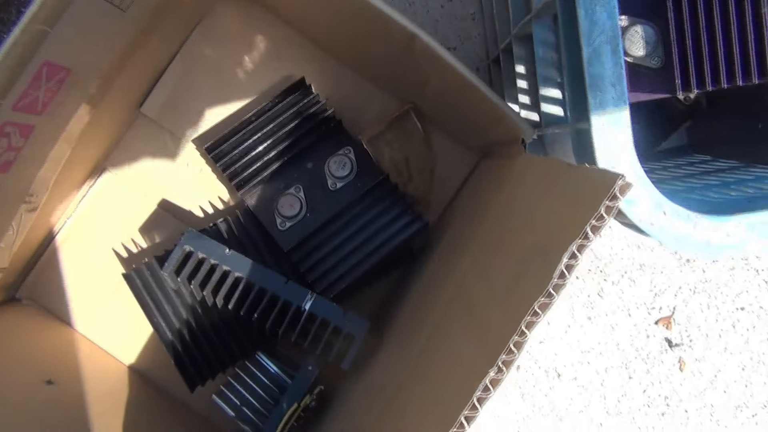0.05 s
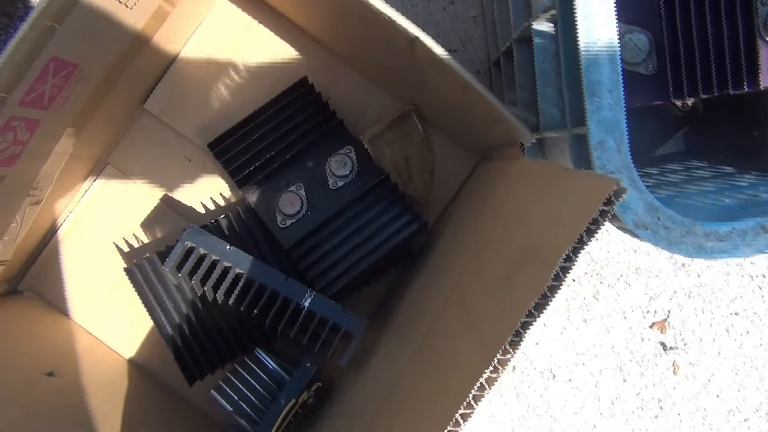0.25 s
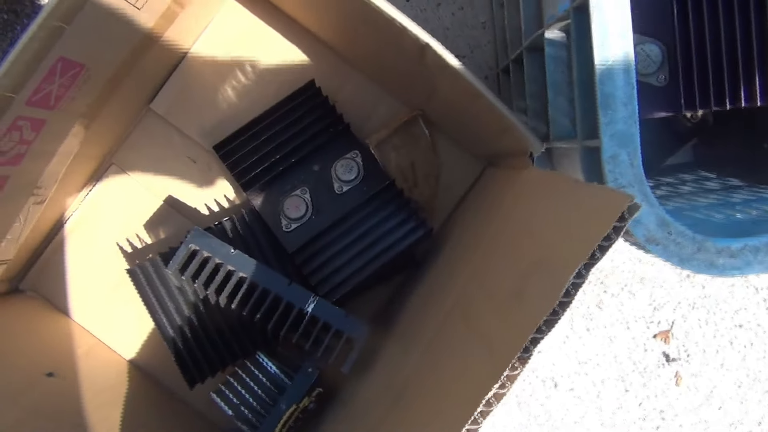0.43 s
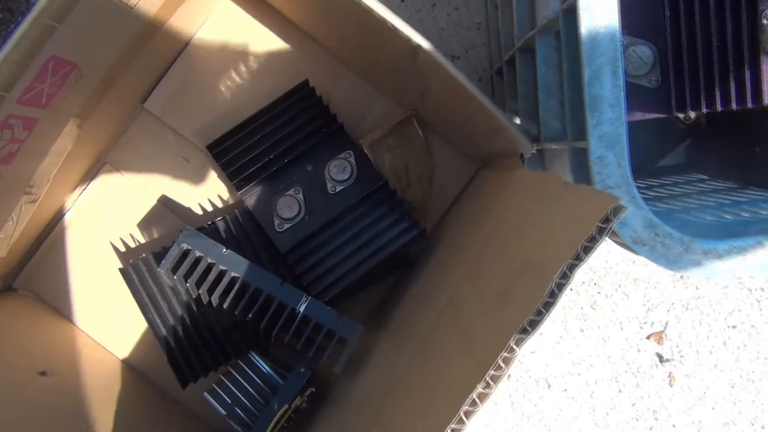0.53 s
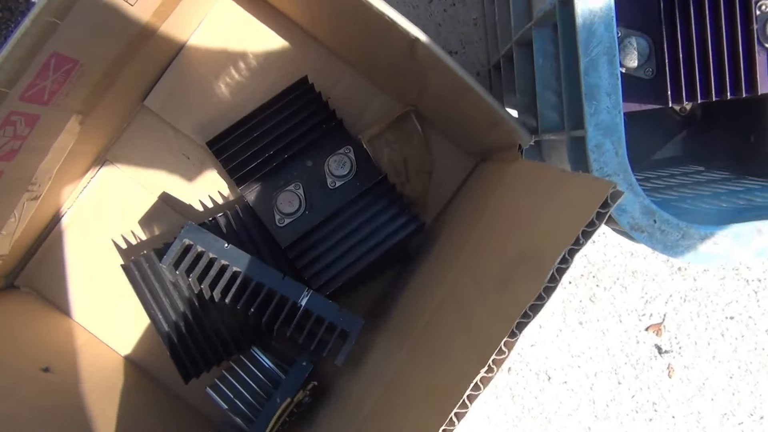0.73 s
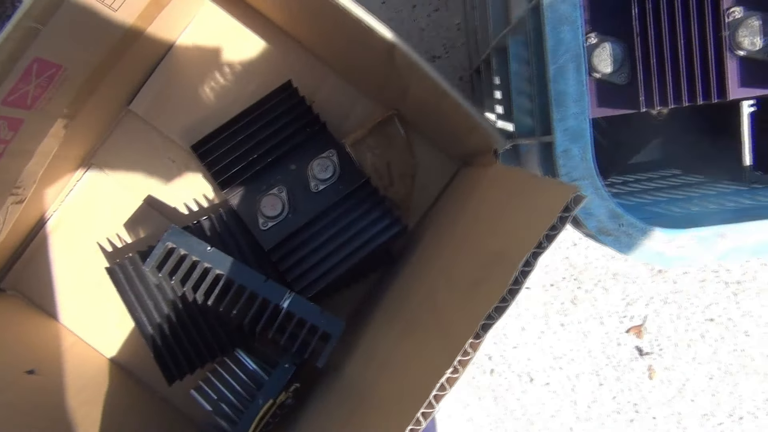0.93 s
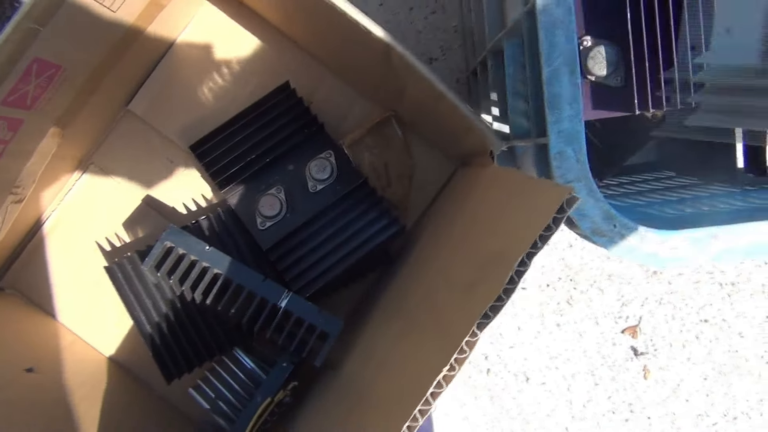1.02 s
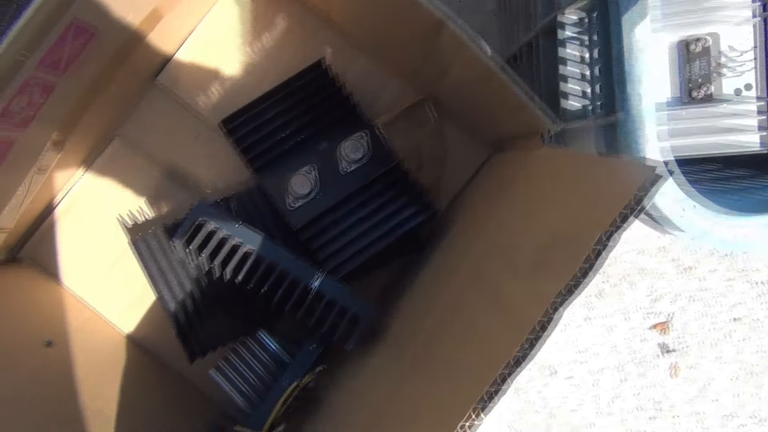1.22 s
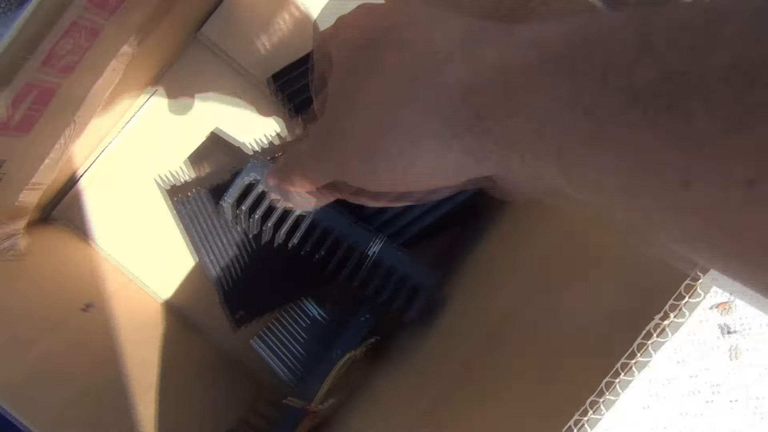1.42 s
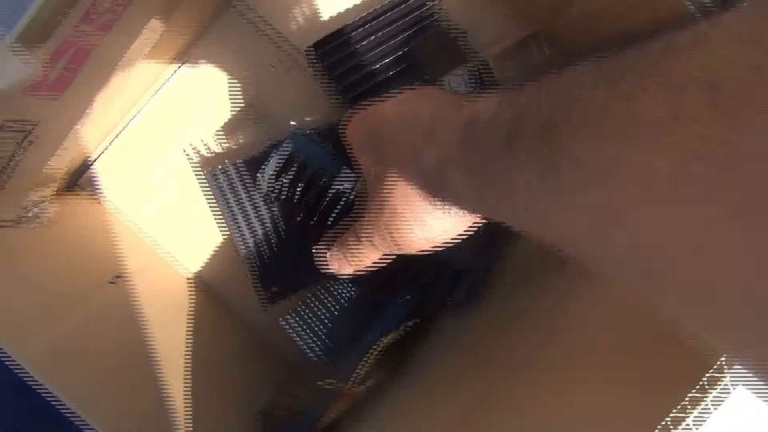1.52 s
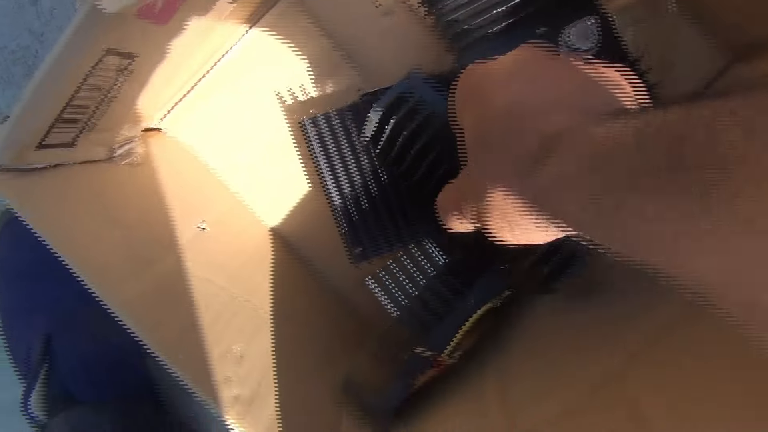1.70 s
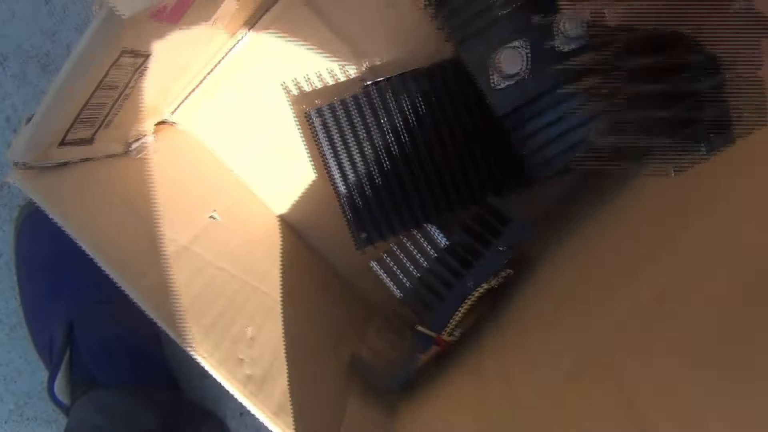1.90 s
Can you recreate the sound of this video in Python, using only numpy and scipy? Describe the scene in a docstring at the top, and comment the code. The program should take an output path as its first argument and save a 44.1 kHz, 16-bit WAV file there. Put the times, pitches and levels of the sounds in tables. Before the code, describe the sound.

Metal parts clatter at close range: light scrapes and clinks build to a bright jangle, then one heat sink lands on a pile in a cardboard box and rings. The pile is softly nudged over a faint hiss.

```python
"""Finned aluminium heat sinks are shifted in a plastic crate, close to a camera's stereo microphone.
One is pulled free, jangling against its neighbours, and is dropped on others in a cardboard box, where
it thuds and rings. A hand then nudges the pile. Each clash is a spray of tiny contacts that rings the
fins; scraping is a run of small slips. Faint rumble and hiss lie underneath, and the recorder's gain
control flattens the loudest clashes."""
import sys
import numpy as np
from scipy import signal
from scipy.fft import irfft, next_fast_len
from scipy.io import wavfile
from scipy.ndimage import uniform_filter1d

SR = 44100
rng = np.random.default_rng(int(sys.argv[2]) if len(sys.argv) > 2 else 0)


def materialize(psi):
    """Save the field psi as 16-bit PCM at rate SR to the path in sys.argv[1].

    A 1-D psi becomes a single channel; in a 2-D psi each row is a channel.
    """
    bounded = np.clip(np.atleast_2d(psi).T, -1, 1)
    quanta = np.round(bounded * 32767).astype(np.int16)
    wavfile.write(sys.argv[1], SR, quanta)


N = 85995
TIME = np.arange(N) / SR
BODY_HZ = np.fft.rfftfreq(2 ** 13, 1 / SR)

# Metal on metal: t/s, strength/dB, chatter decay/s, treble tilt/(dB per octave), heat sink that rings
CLASHES = [(0.0, -23, 0.0089, -8, "lifted"), (0.207, -24, 0.0018, -16, "lifted"),
           (0.342, -15, 0.0016, 2, "lifted"), (0.441, -18, 0.0026, 3.5, "lifted"),
           (0.559, -6.5, 0.0042, 3, "lifted"), (0.578, -7, 0.011, -2.5, "lifted"),
           (0.606, -9, 0.0095, -2, "lifted"), (0.686, -5, 0.0051, -19, "lifted"),
           (0.686, -5.5, 0.0041, -18, "neighbour"), (0.717, -11, 0.0012, -10, "neighbour"),
           (0.738, -31, 0.015, -3, "neighbour"), (0.755, -0.5, 0.0065, 1.5, "neighbour"),
           (0.791, -2.5, 0.0044, -10.5, "neighbour"), (0.826, 8.5, 0.0014, 1.5, "neighbour"),
           (0.853, -6.5, 0.00078, 9, "neighbour"), (0.876, -12, 0.0026, -3, "neighbour"),
           (0.929, -17.5, 0.0046, -3, "neighbour"), (1.164, -30, 0.0081, -9, "dropped"),
           (1.186, 2, 0.011, -8.5, "dropped"), (1.222, -3.5, 0.019, -1.5, "dropped"),
           (1.266, -2.5, 0.021, -2, "dropped")]
# Spectrum of a held or wedged part, knocked or scraped: f/Hz, relative level/dB
WEDGED_SPECTRUM = [(100, -24.5), (450, -24.5), (800, -1.5), (1100, 0), (1400, 1.5), (2000, 6), (3300, 5),
                   (3800, -0.5), (6500, -8), (10000, -14.5), (15500, -36.5)]


def amp(db):
    """Decibels to gain."""
    return 10 ** (np.asarray(db) / 20)


def unit_rms(x):
    """Scales to rms 1."""
    return x / np.sqrt(np.mean(x ** 2) + 1e-20)


def at_hz(points, hz):
    """Reads a table on a log-frequency axis."""
    f, value = np.transpose(points)
    return np.interp(np.log(hz + 1), np.log(f + 1), value)


def wander(position):
    """Random values one unit apart, joined by straight lines."""
    return np.interp(position, np.arange(512), rng.standard_normal(512))


def add(mix, start, sound):
    """Mixes a sound in at its start time in seconds."""
    part = mix[:, round(start * SR):][:, :sound.shape[1]]
    part += sound[:, :part.shape[1]]


def mic_ports(hz):
    """Phase angle (rad) and level lean (dB) between the microphone's left and right ports."""
    correlation = [(50, 1), (1000, 0.91), (2500, 0.86), (4500, 0.75), (6800, 0.5), (8500, 0.85),
                   (9500, 0.44), (10800, 0.61), (13000, 0.73), (16000, 0.81)]  # likeness of the ports: f/Hz, left-right correlation
    left_lean = [(100, 0), (500, 1.5), (1300, -1.5), (4400, -2.5), (8500, 0), (15000, 0)]  # balance: f/Hz, left minus right level/dB
    return np.arccos(at_hz(correlation, hz)), at_hz(left_lean, hz)


def mic_noise(gain, hz):
    """Steady sound of this spectral shape with random phases, as the two ports hear it, at rms 1."""
    phase, side = rng.random((2, len(hz)))
    angle, lean_db = mic_ports(hz)
    spectrum = gain * np.exp(2j * np.pi * phase)
    left = spectrum * amp(lean_db)
    right = spectrum * np.exp(1j * angle * np.sign(side - .3))
    return unit_rms(irfft(np.array([left, right])))


def damped(sound, decay):
    """Lets each band die at its own speed; decay lists f/Hz, t60/s."""
    hz, t, bands = signal.stft(sound, SR, nperseg=256)
    fade = amp(-60 * t / at_hz(decay, hz)[:, None])
    return signal.istft(bands * fade, SR, nperseg=256)[1]


def chatter(ring, decay_s, contacts_per_s=400):
    """A first contact and a dying spray of further ones, each setting off the ring."""
    t = TIME[:SR // 8]
    touches = rng.random(len(t)) < contacts_per_s / SR
    clicks = touches * rng.standard_normal(len(t)) * np.exp(-t / (2 * decay_s))
    clicks[0] = 1.0
    return signal.fftconvolve(ring, clicks[None] / np.linalg.norm(clicks), axes=1)


def blows(hits, spectrum, decay):
    """Short rattling blows on a body with dense, damped modes."""
    out = np.zeros((2, N))
    octaves = np.log2(np.maximum(BODY_HZ, 100))
    for start, db, rattle_s, tilt in hits:
        body = mic_noise(amp(at_hz(spectrum, BODY_HZ) + tilt * octaves), BODY_HZ)
        add(out, start, amp(db) * chatter(damped(body, decay), rattle_s))
    return out


def friction(levels, spectrum, t60, slips_per_s, peaks_db=0, peak_spacing_hz=119.75):
    """Tiny slips of uneven size tick a body's resonances under a level curve."""
    slipping = rng.random(N) < slips_per_s / SR
    size_db = 2.5 * np.minimum(rng.exponential(1, N), 4)
    slips = slipping * amp(size_db) * rng.choice([-1, 1], N)
    peaks = np.clip(wander(BODY_HZ / peak_spacing_hz), -2, 1.5)
    body = mic_noise(amp(at_hz(spectrum, BODY_HZ) + peaks_db * peaks), BODY_HZ)
    tick = body * amp(-60 * TIME[:body.shape[1]] / t60)
    scrape = signal.fftconvolve(tick, slips[None], axes=1)[:, :N]
    return unit_rms(scrape) * amp(np.interp(TIME, *np.transpose(levels)))


def fin_tones(name, clashes):
    """The strongest fin modes gather each clash's energy and ring on; the highest shimmer as fins buzz."""
    modes = { "lifted": [(1528, -29, .45), (1672, -28, .6), (1872, -28, 1.1), (1894, -24, .5),
             (1944, -30, .4), (2001, -29, .6), (2066, -31, 1.4), (2441, -30, .4), (2752, -25, .35),
             (3165, -27, .45), (3278, -25, 1.0), (3397, -31, .7), (3864, -26, .3), (4533, -36, .3),
             (5905, -36, .3), (11076, -39, .4)], "neighbour": [(1869, -29, .85), (1545, -35, .55),
             (1877, -34, .8), (2008, -36, .8), (1902, -25, .4), (2193, -28, .35), (2226, -26, .3),
             (2388, -23, .3), (2546, -33, .6), (2783, -28, .35), (1755, -36, .8), (2911, -13, .16),
             (2946, -28, .4), (3103, -25, .25), (3198, -34, .8), (3268, -35, .8), (3390, -38, .8),
             (3456, -37, .8), (3945, -25, .22), (4054, -39, .6), (5168, -43, .75), (5663, -45, .7),
             (6156, -40, .55)], "dropped": [(1631, -32, .7), (1689, -26, .65), (1737, -16, .45),
             (1745, -21, .6), (1869, -21, .3), (2031, -26, .6), (2090, -29, .8), (2199, -22, .28),
             (2275, -20, .25), (2302, -20, .3), (2604, -26, .65), (2622, -23, .6), (2704, -21, .3),
             (2824, -33, 1.5), (2860, -25, .7), (3104, -31, 1.8), (3143, -37, 1.5), (3112, -18, .4),
             (3178, -27, .7), (4202, -27, .3), (5045, -32, .75), (5136, -36, .75), (5658, -39, .7),
             (5939, -30, .4), (6578, -42, .7), (8950, -35, .6), (9300, -36, .55), (10930, -35, .75),
             (13300, -44, .7)]}  # strongest modes by heat sink: f/Hz, relative level/dB, t60/s
    waver_depth = [(5500, .22), (9000, .9)]  # waver of level and phase: f/Hz, depth
    waver_rate = [(5500, 14), (9000, 130)]  # its pace: f/Hz, changes per s
    power, out = np.zeros((1, N)), np.zeros((2, N))
    ports = np.array([[.5], [-.5]])
    for start, db, chatter_s, _ in clashes:
        push = np.exp(-TIME[:SR // 4] / chatter_s)
        add(power, start, amp(db) ** 2 * push[None] / push.sum())
    for hz, db, t60 in modes[name]:
        energy = signal.lfilter([1], [1, -amp(-120 / (t60 * SR))], power[0])
        depth, pace = at_hz(waver_depth, hz), TIME * at_hz(waver_rate, hz)
        envelope = np.sqrt(2 * energy) * (1 + depth * wander(pace)) / np.hypot(1, depth)
        phase = 2 * np.pi * (hz * TIME + rng.random()) + 2 * depth * wander(pace)
        angle, lean_db = mic_ports(hz)
        out += amp(db + lean_db * ports) * envelope * np.sin(phase - angle * ports)
    return out


def heat_sink(name, mode_count=560, spread_db=3.5, cluster_hz=110.67, cluster_db=4):
    """Each clash rings the strong tones and one crowd of weaker fin modes, in a new mixture each time."""
    crowd_spectrum = { "lifted": [(500, -21.5), (900, -9), (1400, -9), (2000, -2), (3200, -1.5),
                      (4300, -5.5), (6500, -7.5), (8000, -17.5), (11000, -10), (15500, -20.5)],
                      "neighbour": [(500, -38), (1100, -8), (1800, 2), (3100, 6), (4600, -12), (5300, -20),
                      (7500, -24), (9200, -6), (13500, -10), (15500, -8.5)], "dropped": [(500, -20.5),
                      (1000, -20), (1400, -27), (1800, -3), (2300, -1), (3200, -7.5), (3700, -9.5),
                      (4400, -4), (5200, -18), (6200, -11.5), (7700, -27), (9000, -2.5), (9900, -27),
                      (11000, -9), (12000, -37), (13200, -9), (15500, -60)]}  # weaker modes by heat sink: f/Hz, relative level/dB
    crowd_db = {"lifted": -17, "neighbour": -23, "dropped": -13.5}  # gain of the weaker modes by heat sink: level/dB
    tones_db = {"lifted": 0.5, "neighbour": 0, "dropped": -1}  # gain of the strongest modes by heat sink: level/dB
    fin_decay = [(500, 0.21), (2000, 0.52), (3200, 0.65), (5000, 0.56), (10000, 0.49), (15000, 0.17)]  # full ring of the weaker modes: f/Hz, t60/s
    ring_share = {"lifted": 1, "neighbour": 0.97, "dropped": 0.75}  # share of that time for which each heat sink rings
    decay = [(f, t60 * ring_share[name]) for f, t60 in fin_decay]
    clashes = [clash for *clash, part in CLASHES if part == name]
    hz = np.fft.rfftfreq(2 ** 15, 1 / SR)
    is_mode = (rng.random(len(hz)) < mode_count / len(hz)) & (hz > 100)
    mode_db = spread_db * np.clip(rng.standard_normal(len(hz)), -2, 2)
    mode_db += cluster_db * wander(hz / cluster_hz)  # the modes of alike fins form clusters
    crowd = is_mode * amp(mode_db + at_hz(crowd_spectrum[name], hz))
    treble_octaves = np.log2(np.maximum(hz, 2000))
    out = amp(tones_db[name]) * fin_tones(name, clashes)
    for start, db, chatter_s, tilt in clashes:
        ring = damped(mic_noise(crowd * amp(tilt * treble_octaves), hz), decay)
        add(out, start, amp(db + crowd_db[name]) * chatter(ring, chatter_s))
    return out


def pings():
    """Wedged fins, the crate, the box and the settling pile answer knocks with single dying modes."""
    modes = [(0.0, 2050, -37, 0.7), (0.0, 3440, -44, 1.1), (0.094, 2043, -40.5, 0.5),
             (0.0, 3224, -37.5, 0.6), (0.236, 2860, -39, 0.3), (0.342, 2968, -21, 0.085),
             (0.343, 3499, -23.5, 0.16), (0.345, 5230, -25.5, 0.098), (0.344, 1884, -30, 0.64),
             (0.442, 3282, -40, 0.5), (0.442, 4245, -30.5, 0.17), (0.442, 735, -27, 0.034),
             (0.558, 8700, -36, 0.13), (0.619, 119, -30.5, 0.2), (0.686, 2830, -18.5, 0.38),
             (0.756, 4650, -16, 0.38), (0.793, 4640, -13.5, 0.35), (1.651, 320, -27, 0.079),
             (1.655, 1048, -18.5, 0.042), (1.651, 1375, -15.5, 0.026), (1.652, 2010, -27.5, 0.093),
             (1.278, 115, -41.5, 0.3)]  # struck modes: t/s, f/Hz, level/dB, t60/s
    out, t = np.zeros((2, N)), TIME[:SR]
    for start, hz, db, t60 in modes:
        ping = amp(db - 60 * t / t60) * np.sin(2 * np.pi * hz * t)
        add(out, start, ping[None])
    return out


def sliding_parts():
    """Parts scrape over each other in dense, quickly damped slips."""
    levels = [(0, -53), (.06, -40), (.19, -37.5), (.26, -40), (.3, -43.5), (.328, -42), (.34, -23.5),
              (.36, -52), (.41, -38), (.5, -43.5), (.56, -40.5), (1.1, -44.5), (1.55, -41.5), (1.68, -46),
              (1.77, -52), (1.87, -56), (1.95, -50)]  # course of the scraping: t/s, level/dB
    return friction(levels, WEDGED_SPECTRUM, t60=.11, slips_per_s=1100, peaks_db=3.5)


def cardboard_rub():
    """The load drags on the cardboard and stirs its hollow resonances."""
    levels = [(0, -54.5), (.16, -40), (.3, -51), (.93, -50), (1.1, -68), (1.4, -79), (1.51, -47),
              (1.6, -50), (1.68, -40), (1.77, -57.5), (1.82, -58), (1.85, -43.5), (1.885, -41.5),
              (1.91, -64)]  # course of the rubbing: t/s, level/dB
    spectrum = [(30, -29), (80, -35), (170, 2), (240, -20), (320, 4), (480, -21), (660, 3.5), (800, -14.5),
                (980, 5.5), (1250, -19.5), (2500, -10.5), (6000, -29), (11000, -15.5), (15500, -32)]  # rubbed cardboard: f/Hz, relative level/dB
    return friction(levels, spectrum, t60=.061, slips_per_s=1400)


def room_tone(level_db=-52.5):
    """Faint steady rumble and hiss at the microphone."""
    spectrum = [(25, 2), (60, 7), (120, -1.5), (250, -3), (600, -24), (2000, -18), (6000, -39),
                (9500, -10.5), (13000, -25), (15500, -24)]  # background: f/Hz, relative level/dB
    hz = np.fft.rfftfreq(next_fast_len(N + 2, True), 1 / SR)
    return amp(level_db) * mic_noise(amp(at_hz(spectrum, hz)), hz)[:, :N]


def wedged_knocks():
    """Parts that are held or wedged knock with hardly any ring."""
    hits = [(0.094, -26.5, 0.0017, -5.5), (0.207, -24.5, 0.0031, -5.5), (0.234, -22, 0.00055, -3.5),
            (0.344, -14.5, 0.0018, -3.5), (0.442, -23, 0.0075, -4.5), (0.559, -23.5, 0.00091, -5),
            (0.572, -18.5, 0.012, -1.5), (0.607, -17, 0.0024, -4.5), (0.619, -15, 0.0059, -4),
            (0.686, -18, 0.002, -1.5), (0.697, -21.5, 0.0015, -4.5), (0.716, -22.5, 0.00032, -4),
            (0.729, -24.5, 0.0005, -2), (0.738, -9.5, 0.0033, 0), (0.826, -11.5, 0.0022, -0.5),
            (0.876, -12.5, 0.0027, 2.5), (0.99, -27, 0.0025, 0), (1.156, -22, 0.0067, 4.5),
            (1.164, -19.5, 0.0011, 4), (1.187, -5, 0.0008, 3), (1.278, -11.5, 0.0037, 0.5),
            (1.623, -28.5, .0004, -7), (1.652, -31, 0.0019, 10), (1.715, -38, 0.005, -3)]  # knocks: t/s, level/dB, rattle decay/s, tilt/(dB per octave)
    decay = [(100, 0.38), (800, 0.077), (3000, 0.11), (12000, 0.11)]  # damping of the parts: f/Hz, t60/s
    return blows(hits, WEDGED_SPECTRUM, decay)


def skittering_fins():
    """Fin edges skip over each other in sparse, bright ticks."""
    levels = [(.555, -56), (.57, -31), (.66, -34), (.74, -28), (.85, -8.5), (.93, -22.5), (.98, -39.5),
              (1.175, -43), (1.19, -9.5), (1.29, -23), (1.36, -31.5), (1.43, -56)]  # course of the skittering: t/s, level/dB
    spectrum = [(500, -21.5), (1500, -3), (2800, 9.5), (4700, 3), (7000, -1), (9200, -9.5), (13000, -10),
                (15500, -20)]  # fin edges: f/Hz, relative level/dB
    return friction(levels, spectrum, t60=.1, slips_per_s=110, peaks_db=9)


def box_thuds():
    """Blows on the cardboard floor of the box, whose low modes last longest."""
    hits = [(0.615, -40, 0.0093, -3), (1.157, -13.5, 0.0044, 1), (1.18, -15.5, 0.00085, 0),
            (1.582, -42, 0.0031, 9), (1.652, -33.5, 0.0018, -1), (1.69, -39, 0.021, -8)]  # blows: t/s, level/dB, rattle decay/s, tilt/(dB per octave)
    spectrum = [(30, -15), (70, -7), (130, -4.5), (220, -4), (450, -9), (800, 4), (1300, -2), (2200, -7.5),
                (6000, -61)]  # struck cardboard: f/Hz, relative level/dB
    decay = [(60, 0.29), (300, 0.087), (1000, 0.079), (5000, 0.015)]  # damping of the box: f/Hz, t60/s
    return blows(hits, spectrum, decay)


def scene():
    """Ringing metal, knocks, scraping and cardboard at close range, over quiet room tone."""
    metal = sum(heat_sink(name) for name in ("lifted", "neighbour", "dropped")) + wedged_knocks()
    scraping = sliding_parts() + skittering_fins()
    box = box_thuds() + cardboard_rub()
    return metal + scraping + box + pings() + room_tone()


def record(dry, low_cut_hz=106, threshold_db=-15, ratio=3.6, recover_db_per_s=131, top_hz=15900):
    """The camera's input: low cut, gain control that clamps clashes and recovers steadily, band limit."""
    cut = signal.sosfilt(signal.butter(2, low_cut_hz, "high", fs=SR, output="sos"), dry)
    power = uniform_filter1d((cut ** 2).mean(0), size=220)  # 5 ms average
    power_db = 10 * np.log10(abs(power) + 1e-12)
    recovery_db = TIME * recover_db_per_s
    peak_db = np.maximum.accumulate(power_db + recovery_db) - recovery_db
    over_db = uniform_filter1d(np.maximum(peak_db - threshold_db, 0), size=100)
    clamped = cut / amp((1 - 1 / ratio) * over_db)
    band_limit = signal.firwin(255, top_hz, window=("kaiser", 9), fs=SR)
    return signal.oaconvolve(clamped, band_limit[None], "same")


dry = scene()
out = record(dry)
materialize(out)
```